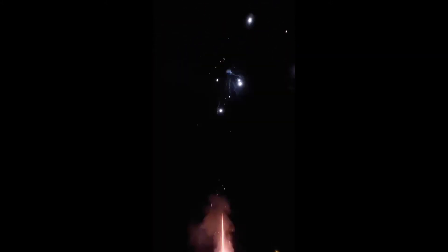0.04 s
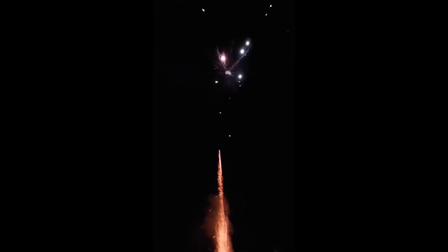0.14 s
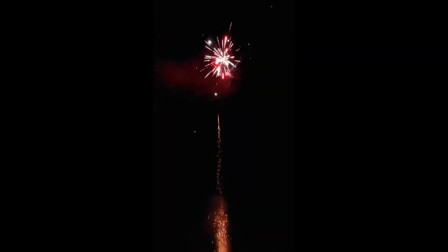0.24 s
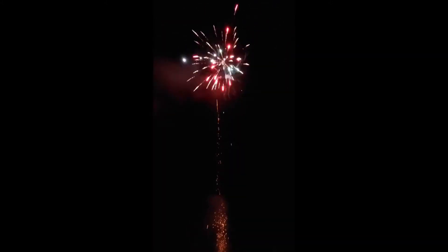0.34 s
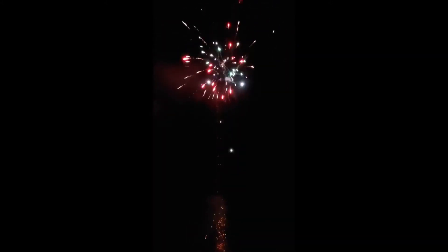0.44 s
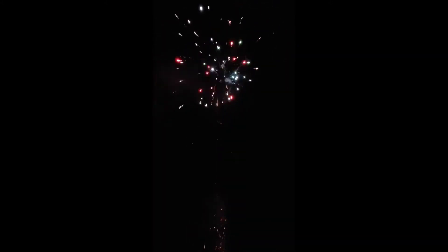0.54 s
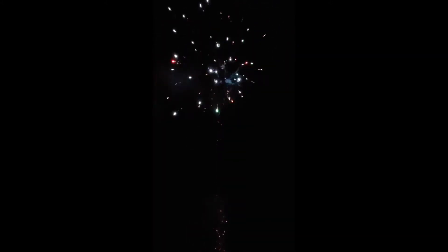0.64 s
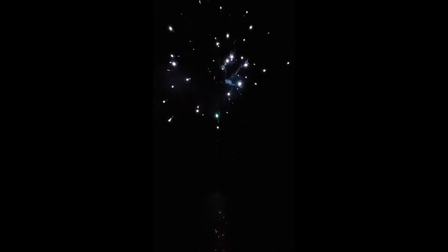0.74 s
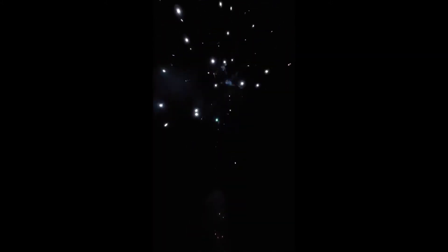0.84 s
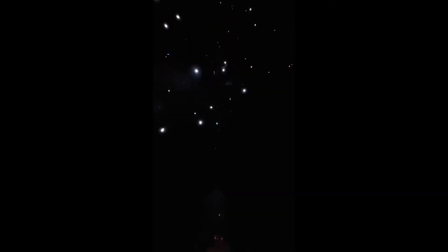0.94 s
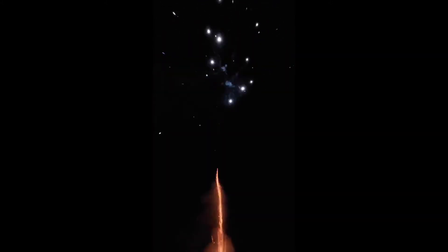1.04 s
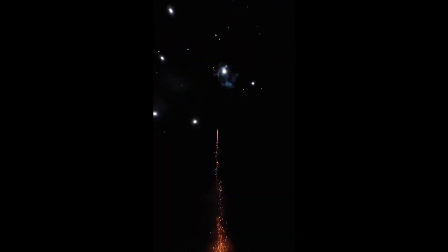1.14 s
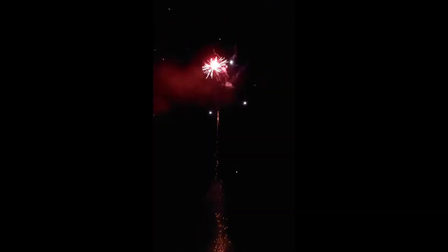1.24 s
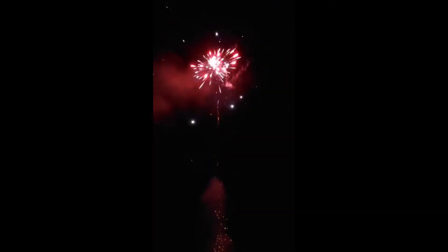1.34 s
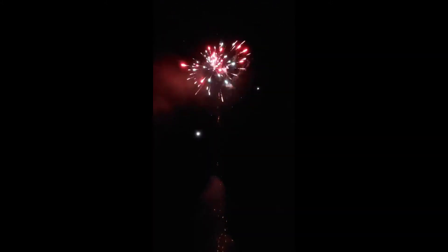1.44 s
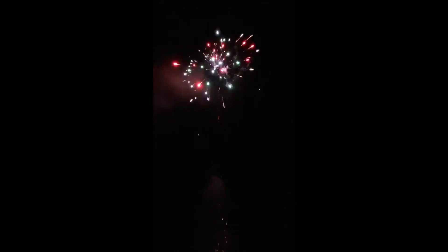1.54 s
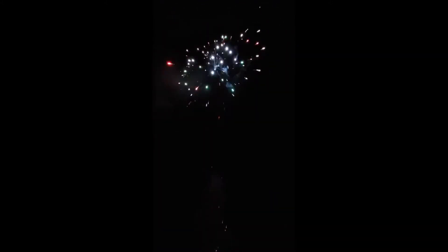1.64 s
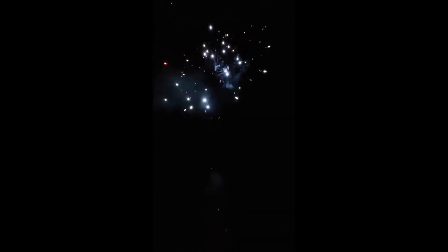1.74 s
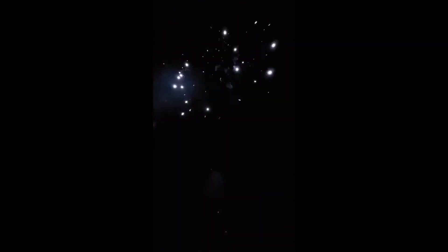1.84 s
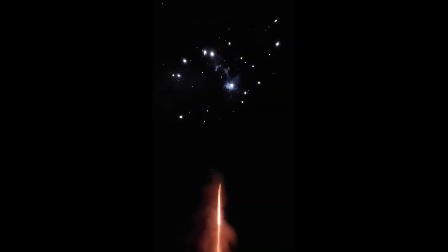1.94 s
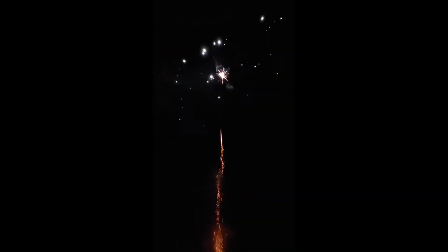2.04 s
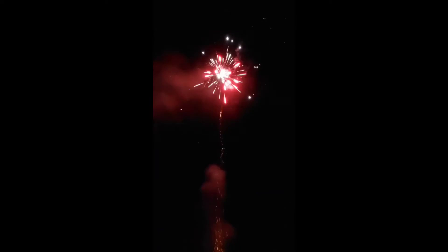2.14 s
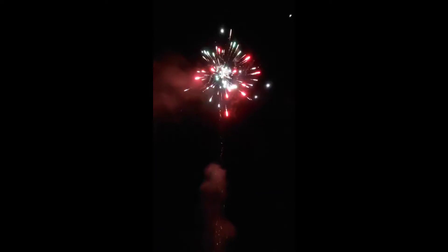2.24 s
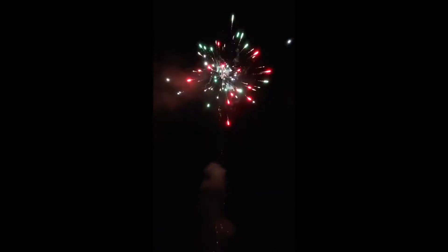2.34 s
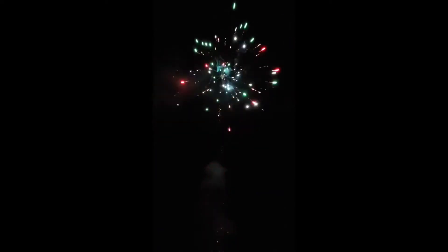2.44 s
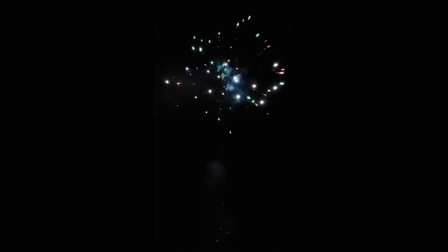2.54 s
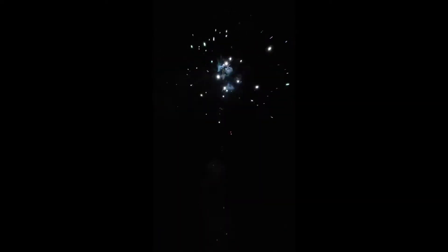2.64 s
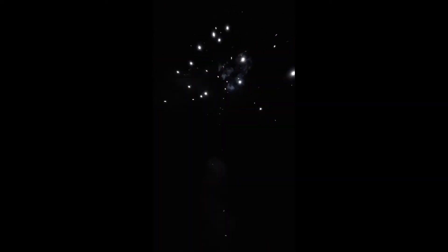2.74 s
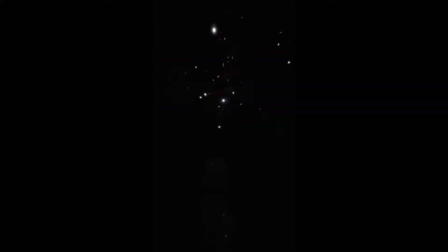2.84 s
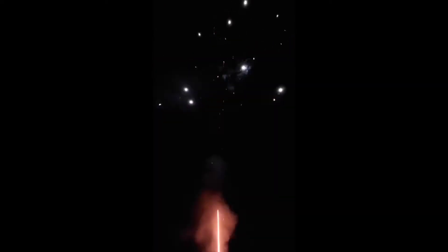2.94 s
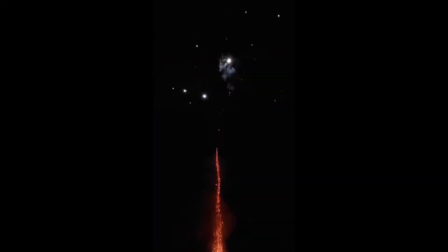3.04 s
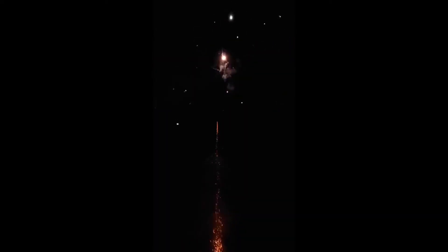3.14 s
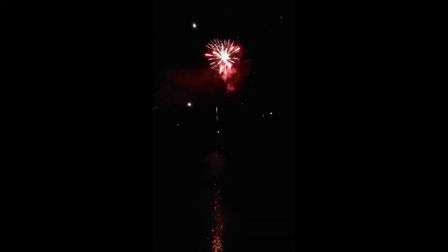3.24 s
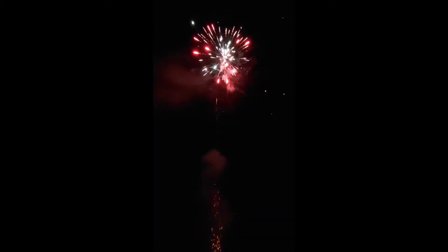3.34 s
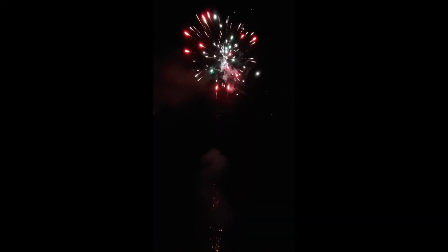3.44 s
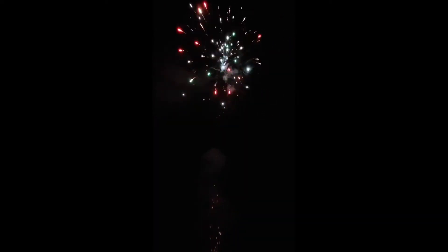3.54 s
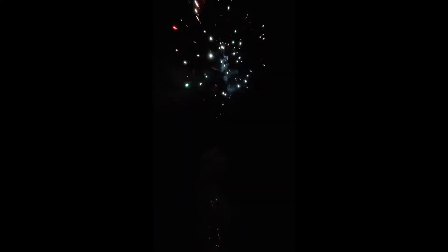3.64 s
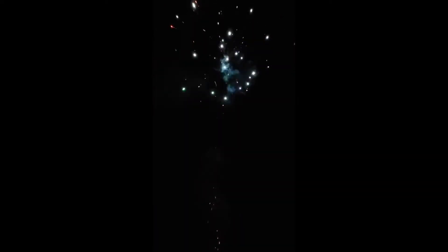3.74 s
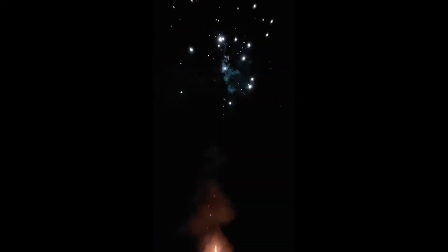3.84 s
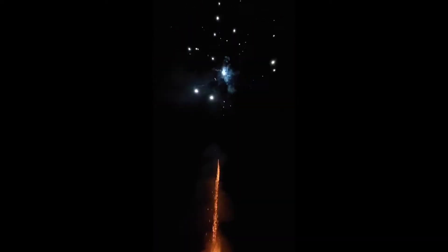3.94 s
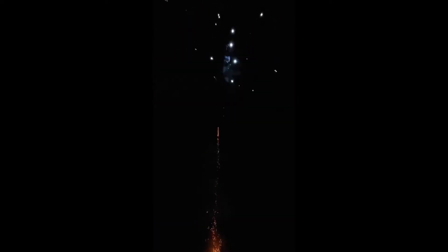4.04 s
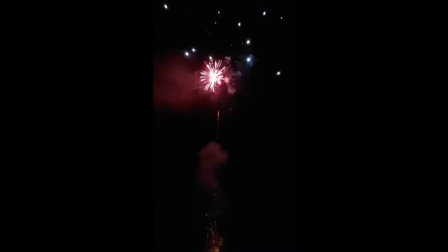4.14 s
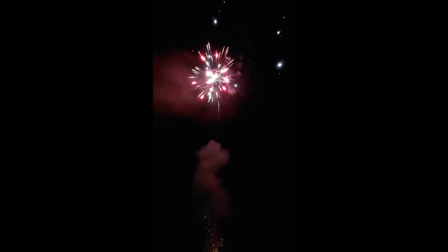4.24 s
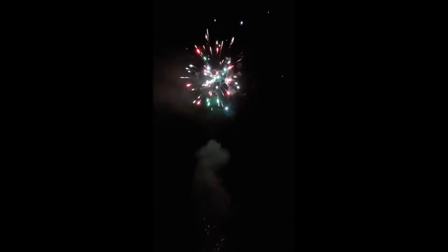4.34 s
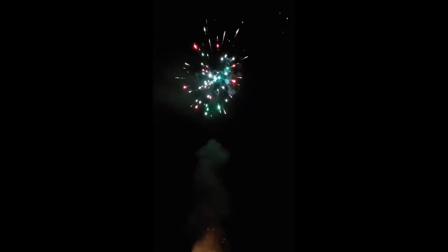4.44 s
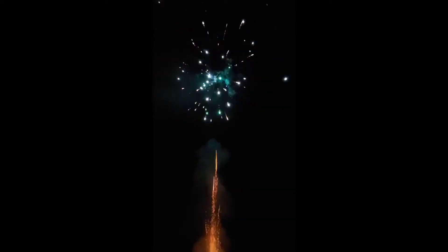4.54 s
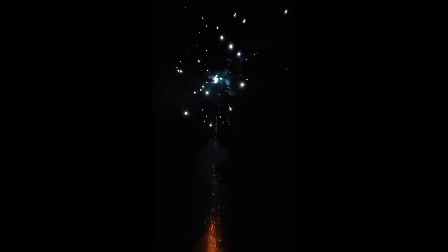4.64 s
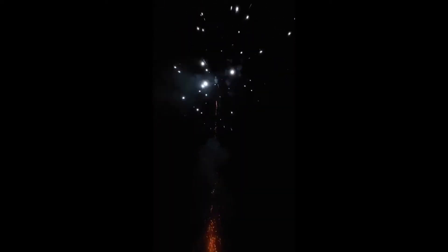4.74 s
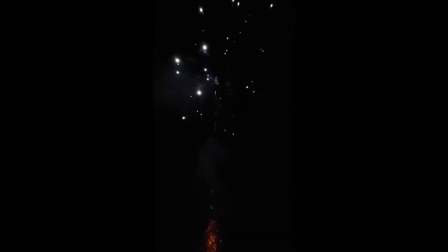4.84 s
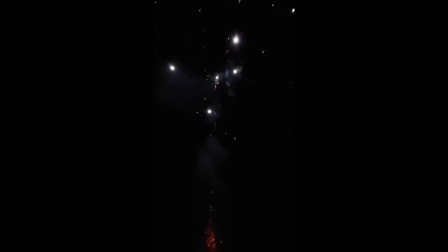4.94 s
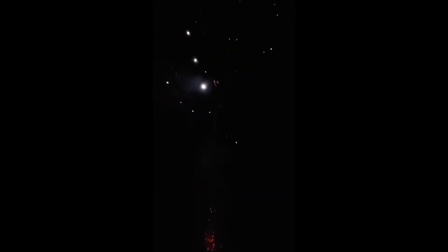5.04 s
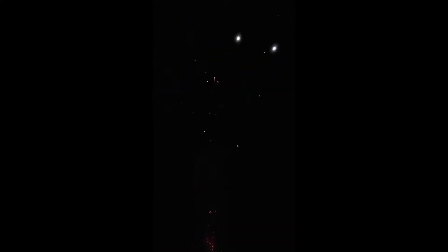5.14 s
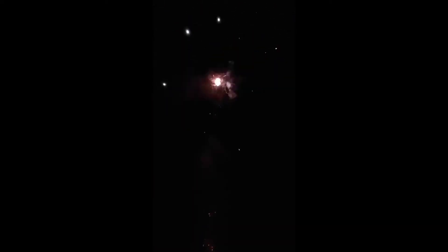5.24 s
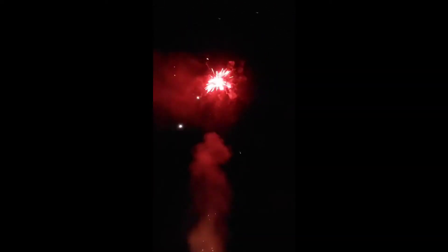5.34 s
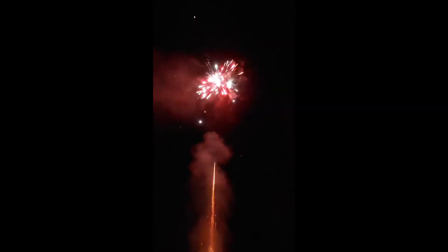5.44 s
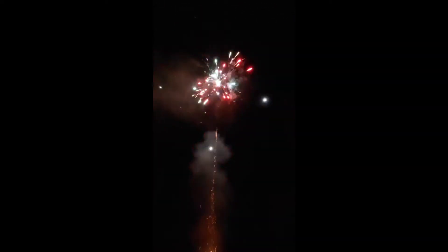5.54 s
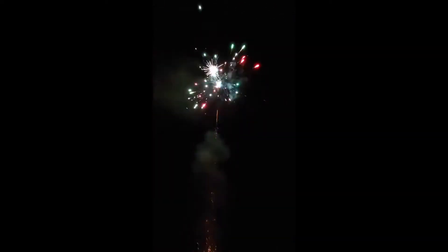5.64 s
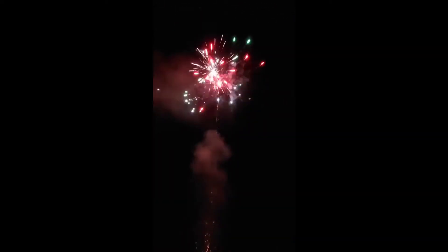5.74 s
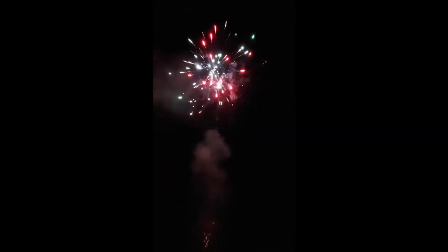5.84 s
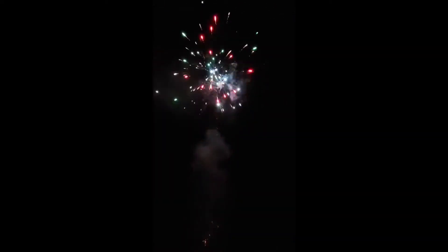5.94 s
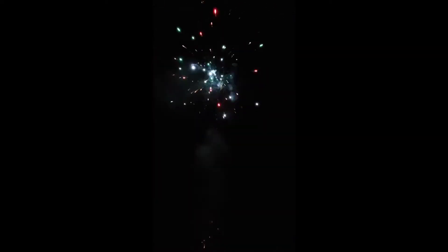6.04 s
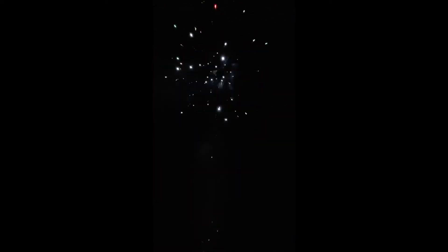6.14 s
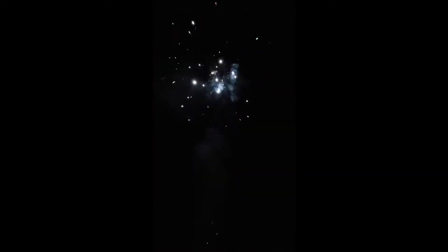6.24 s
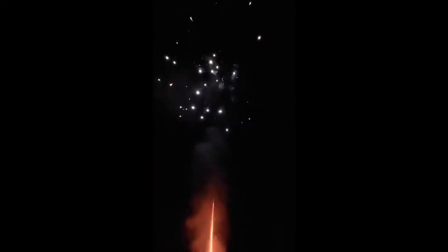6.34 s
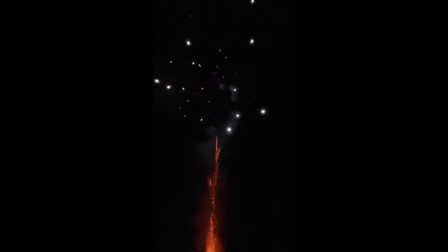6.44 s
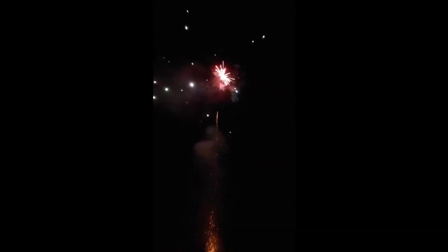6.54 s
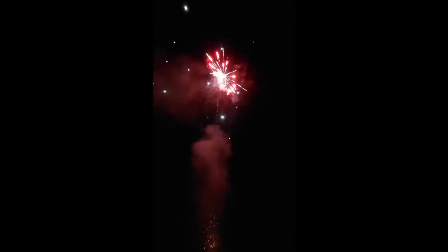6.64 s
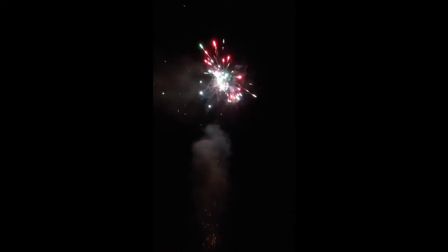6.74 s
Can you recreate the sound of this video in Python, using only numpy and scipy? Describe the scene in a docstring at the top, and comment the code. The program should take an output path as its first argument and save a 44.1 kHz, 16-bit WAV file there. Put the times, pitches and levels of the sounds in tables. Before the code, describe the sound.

A firework cake fires shot after shot outdoors, sharp launch bangs alternating with deeper overhead bursts that echo into the distance.

```python
"""A firework cake fires shot after shot, outdoors at night.
Each lift charge leaves its tube with a sharp bang and a hollow knock; the shell bursts overhead with
a deeper report. Both are a pressure swing with a crack of noise on its front and a thump of gas below.
Walls and ground slap each blast back, the surroundings scatter it, and it rolls away into the distance.
Underneath lies a bed of quiet night air, with one far thud and one thin snap."""
import sys
import numpy as np
from scipy import signal
from scipy.fft import rfft, irfft, next_fast_len
from scipy.io import wavfile
from scipy.ndimage import uniform_filter1d

SR = 44100
rng = np.random.default_rng(int(sys.argv[2]) if len(sys.argv) > 2 else 0)


def generate_wav(sig):
    """Save sig (samples, or channels by samples) to the path in sys.argv[1] as 16-bit PCM at SR."""
    pcm = np.round(np.clip(np.atleast_2d(sig).T, -1, 1) * 32767).astype(np.int16)
    wavfile.write(sys.argv[1], SR, pcm)


N = 298998


def amp(db):
    """Decibels to gain."""
    return 10 ** (np.asarray(db) / 20)


def pan(db):
    """Channel gains for a left-minus-right level difference."""
    return amp([[db / 2], [-db / 2]])


def curve(points, hz):
    """A table joined by straight lines on a log-frequency axis."""
    f, value = np.transpose(points)
    return np.interp(np.log(hz + 1), np.log(f + 1), value)


def add(mix, s, sound):
    """Mixes a stereo sound in at time s."""
    start = round(s * SR)
    sound = sound[:, max(-start, 0):]
    part = mix[:, max(start, 0):][:, :sound.shape[1]]
    part += sound[:, :part.shape[1]]


# Stereo image of diffuse sound, mono in the bass and wide on top: f/Hz, coherence
COHERENCE = [(60, 1), (130, 0.78), (290, 0.85), (640, 0.22), (1400, -0.25), (3000, 0.03), (16000, 0.032)]

def noise(spectrum, size, treble_db=0, ring=()):
    """Diffuse stereo noise with resonant peaks, set to unit level ahead of a treble shelf."""
    hz = np.fft.rfftfreq(size, 1 / SR)
    left, unrelated = rfft(rng.standard_normal((2, size)))
    alike = np.clip(curve(COHERENCE, hz), -1, 1)
    right = alike * left + np.sqrt(1 - alike ** 2) * unrelated
    peaks_db = sum(db / (1 + (2 * (hz - centre) / width) ** 2) for centre, width, db in ring)
    colour = amp(curve(spectrum, hz) + peaks_db)
    colour /= np.sqrt(np.mean(colour ** 2))
    shelf = amp(treble_db * hz ** 2 / (hz ** 2 + 1400 ** 2))
    return irfft(np.array([left, right]) * colour * shelf, size)


def die_away(x, decay, hold_s, rise_s, patchy_db=1.66):
    """Reverb envelope: echoes build up and hold, then each band fades unevenly at its own speed."""
    hz, t, bands = signal.stft(x, SR, nperseg=256)
    patches = uniform_filter1d(rng.standard_normal(bands.shape[1:]), size=9, axis=1)
    patches = uniform_filter1d(patches, size=2, axis=0)
    fall_db = 60 * np.maximum(t - hold_s, 0) / curve(decay, hz)[:, None]
    faded = signal.istft(bands * amp(patchy_db * patches / patches.std() - fall_db), SR, nperseg=256)[1]
    attack = 1 - np.exp(-(np.arange(x.shape[1]) / SR / rise_s) ** 2)
    return faded[:, :x.shape[1]] * attack


def clumps(size, per_s, depth_db):
    """A random gain: echoes arrive in clumps."""
    knots = np.arange(size) / SR * per_s
    return amp(depth_db * np.interp(knots, np.arange(1024), rng.standard_normal(1024)))


# Dark tone of the ambience bed: f/Hz, level/dB
NIGHT_TONE = [(20, -14), (60, -7.5), (130, 0), (400, -3), (700, -6.5), (1100, -10.5), (2400, -23),
              (3500, -36), (9300, -38.5), (12500, -33), (16000, -41.5)]

def night_air():
    """A faint, steady bed of low noise."""
    return amp(-58.5) * noise(NIGHT_TONE, N)


def thump(db, hz, fade_s, pan_db=0, skew_rad=0, size=8192):
    """The push of expanding gas: a fast-dying bass swing, with a random phase skew between channels."""
    t = np.arange(size) / SR
    phase = skew_rad * rng.uniform(-1.2, 1) * np.array([[1], [-1]])
    envelope = t / fade_s * np.exp(1 - t / fade_s)
    return amp(db) * np.sin(2 * np.pi * hz * t + phase) * envelope * pan(pan_db)


def small_pops(size=4096):
    """A soft, far thud and one thin snap between the shots."""
    out, t = np.zeros((2, N)), np.arange(size) / SR
    add(out, 4.208, thump(-41.5, hz=100, fade_s=.014))
    snap = np.diff(rng.standard_normal((2, size + 1))) * np.exp(-t / .00064)  # all treble
    add(out, 4.7035, amp(-28) * snap)
    return out


# Tone of the distant echoes: f/Hz, level/dB
ROLL_TONE = [(25, -23.5), (90, -9), (190, -8.5), (430, 1.5), (680, -4.5), (1100, -10), (2500, -14),
             (5000, -23), (9300, -37.5), (12500, -40), (16000, -44)]
# Length of their tail: f/Hz, T60/s
ROLL_T60 = [(60, 2), (450, 2.22), (1500, 2.26), (5000, 1.83), (14000, 2.46)]

def roll(db, hold_s, rise_s, treble_db=0, size=81920):
    """Distant houses and trees return a long rumble that comes in swells, under a smooth hiss."""
    tail = amp(db) * die_away(noise(ROLL_TONE, size, treble_db), ROLL_T60, hold_s, rise_s)
    rumble = signal.sosfiltfilt(signal.butter(2, 900, fs=SR, output="sos"), tail)
    hiss = tail - rumble
    return hiss + rumble * clumps(size, per_s=36, depth_db=3.5)


def far_echo(db, fade_s=.009, size=8192):
    """A report comes back from a distant wall, dull and smeared."""
    t = np.arange(size) / SR
    return amp(db) * noise(ROLL_TONE, size, treble_db=-10.5) * t / fade_s * np.exp(1 - t / fade_s)


def near_surface(x, spacing_hz=985, depth_db=1.34):
    """Sound from above glances off a surface near the microphone: a light comb filter in the mids."""
    hz = np.fft.rfftfreq(x.shape[1], 1 / SR)
    mids = hz ** 2 / (hz ** 2 + 1000 ** 2) / (1 + (hz / 7000) ** 4)
    comb_db = -depth_db * np.cos(2 * np.pi * hz / spacing_hz) * mids
    return irfft(rfft(x) * amp(comb_db), x.shape[1])


# Tone of the crack on a blast's front: f/Hz, level/dB
CRACK_TONE = [(100, -16), (500, 3.5), (1200, 2), (2300, -1), (4000, -9.5), (7000, -13.5), (9800, -22),
              (12500, -17), (16000, -18.5)]

def blast(swing_db, hz, crack_db, fade_s, pan_db=0, ring=(), size=6144):
    """One pressure swing for body, its pitch and size varying by chance, and a ragged crack for attack."""
    pitch, left, right = np.exp(.058 * rng.standard_normal(3))
    t = np.arange(size) / SR - np.array([[.0003], [0]])  # reaches the right channel first
    phase = np.pi * (hz * pitch * t - .5)
    swing = (1 - 2 * phase ** 2) * np.exp(-phase ** 2) * [[left], [right]] * pan(pan_db)
    crack = noise(CRACK_TONE, size, ring=ring) * np.exp(-np.maximum(t, 0) / fade_s)
    return (amp(swing_db) * swing + amp(crack_db) * crack) * (t > 0)


# Slapback of a launch off the walls, nearest first: t/s, level/dB
WALL_SLAPS = [(0.0104, -5.5), (0.0116, -9), (.04, -18.5), (.066, -15), (.1025, -22.5)]

def lift_bang(swing_db, ground_lag_s=.0022, size=12288):
    """A lift charge: a bright direct blast, a duller ground bounce, then a thin slap from each wall."""
    out = np.zeros((2, size))
    bite, snap = [(1440, 1200, 1.3)], [(12500, 9000, 4.9)]  # f/Hz, width/Hz, boost/dB
    add(out, 0, blast(swing_db - 9, hz=346, crack_db=-4.5, fade_s=.0017, ring=bite + snap))
    bounce = blast(swing_db - 19, hz=180, crack_db=-13.5, fade_s=.005, pan_db=-4.5, ring=bite)
    add(out, ground_lag_s, bounce)
    for delay, db in WALL_SLAPS:
        add(out, delay, -amp(db) * blast(-13.5, hz=685, crack_db=-5, fade_s=.0028, ring=bite))
    return out


# Resonances of the launch tubes and their casing: f/Hz, width/Hz, level/dB
TUBE_MODES = [(784, 180, 4.5), (1140, 41, 4.5), (1565, 70, 1.5), (1700, 96, 5.5), (1823, 75, 5.5),
              (2715, 54, 2.5), (3080, 46, -1.5)]

def tube_knock(db, fade_s=.0079, size=4096):
    """The tubes give a short hollow knock, heard once directly and once off the nearest wall."""
    t = np.arange(size) / SR
    hz, _, mode_db = np.transpose(TUBE_MODES)[:, :, None]
    knock = np.zeros((2, size))
    for delay in (0, WALL_SLAPS[0][0]):
        phase = rng.uniform(0, 2 * np.pi, (2, len(hz), 1))
        modes = amp(mode_db) * np.sin(2 * np.pi * hz * t + phase)
        add(knock, delay, modes.sum(1) * np.exp(-t / fade_s))
    return amp(db) * knock


# Launch cues, as trims on a typical shot: t/s, level/dB, swing/dB, thump/dB, fresh-echo treble/dB
LAUNCH_CUES = [(0.1969, 1, 0, 4, 2.5), (1.096, -.5, -8, 5.5, 4), (2.0319, 0, 3, 3.5, 4),
               (3.0508, 0.5, -5, 7, 5.9), (3.9783, 0, 1.5, 10.5, -2), (4.592, 0.1, -2.5, 8, 2.7),
               (5.4958, -2.5, -6, -5, -5), (6.464, 2.5, 0, 2.5, 3.4)]
# Tone of a launch's scattered echoes: f/Hz, level/dB
LAUNCH_ECHO_TONE = [(20, -16.5), (55, -11.5), (120, -1), (270, 5.5), (500, 0.5), (900, -2.5), (1900, -3.5),
                    (3200, -7.5), (7000, -18), (9700, -24), (12500, -20), (16000, -27)]
# Length of their tail: f/Hz, T60/s
LAUNCH_T60 = [(50, 0.67), (250, 0.29), (1000, 0.47), (3000, 0.5), (7000, 0.46), (14000, 0.38)]

def launches(shared=.55, size=32768):
    """Lift charges bang, knock and thump from one spot, so they share much of their echo pattern."""
    out = np.zeros((2, N))
    pattern = noise(LAUNCH_ECHO_TONE, size, ring=TUBE_MODES)
    for s, db, swing_db, thump_db, treble_db in LAUNCH_CUES:
        fresh = noise(LAUNCH_ECHO_TONE, size, treble_db, TUBE_MODES)
        echoes = np.sqrt(shared) * pattern + np.sqrt(1 - shared) * fresh
        echoes = die_away(echoes, LAUNCH_T60, hold_s=.029, rise_s=.009)
        echoes *= clumps(size, per_s=860, depth_db=.5)
        add(out, s, amp(db) * lift_bang(swing_db))
        add(out, s, tube_knock(db - 28.5))
        add(out, s + .00072, thump(thump_db - 23, hz=94, fade_s=.0039, pan_db=4, skew_rad=.7))
        add(out, s, amp(db - 21.5) * echoes * pan(.4))
        add(out, s, roll(-53, hold_s=.19, rise_s=.06, treble_db=2))
    return out


def report(ground_lag_s=.007, wall_lag_s=.0095, size=8192):
    """A shell's deep blast, its sharper, inverted ground reflection, and a dull boom off a near wall."""
    out = np.zeros((2, size))
    add(out, 0, blast(-6, hz=212, crack_db=-8.5, fade_s=.003, pan_db=-4.5))
    add(out, ground_lag_s, -blast(-.6, hz=460, crack_db=-26.5, fade_s=.003, pan_db=-4.5))
    add(out, wall_lag_s, -blast(-17.5, hz=145, crack_db=-20, fade_s=.003))
    return out


# Burst cues, as trims on a typical shell: t/s, report level/dB, thump level/dB
BURST_CUES = [(0.3793, 1.5, 4), (1.411, -0.5, -15), (2.2456, -1.5, 19), (3.397, 0, 15), (4.299, 2, 14),
              (5.4762, 1, -15), (5.8539, 0.5, -15), (6.726, -1.3, 19)]
# Tone of a burst's scattered echoes: f/Hz, level/dB
BURST_ECHO_TONE = [(20, -14), (55, -21.5), (110, -9), (270, 2.5), (520, 0), (1000, -5.5), (2300, -12.5),
                   (3500, -18.5), (7000, -23.5), (9700, -31.5), (12500, -26), (16000, -34.5)]
# Length of their tail: f/Hz, T60/s
BURST_T60 = [(50, 0.19), (250, 0.44), (1000, 0.58), (3000, 0.71), (7000, 0.63), (14000, 0.48)]
# Delay taps from distant walls: t/s, level/dB
FAR_TAPS = [(.13, -30.5), (.195, -33), (.295, -37.5), (.42, -49), (.505, -46)]

def bursts(size=36864):
    """Shells burst high up: a report and a low thump, then wide scatter, far echoes and a long roll."""
    direct, diffuse = np.zeros((2, 2, N))
    for s, report_db, thump_db in BURST_CUES:
        echoes = noise(BURST_ECHO_TONE, size, treble_db=3)
        echoes = die_away(echoes, BURST_T60, hold_s=.037, rise_s=.0071)
        echoes *= clumps(size, per_s=120, depth_db=-.3)
        add(direct, s, amp(report_db) * report())
        add(direct, s + .012, thump(thump_db - 38, hz=55.7, fade_s=.004, pan_db=-5.5, skew_rad=.5))
        add(diffuse, s, amp(-21.5) * echoes * pan(.68))
        add(diffuse, s, roll(-37, hold_s=.2, rise_s=.13))
        jitter = rng.standard_normal((len(FAR_TAPS), 2))  # each shell bursts at another spot
        for (delay, db), (shift, trim_db) in zip(FAR_TAPS, jitter):
            add(diffuse, s + delay + .012 * shift, far_echo(db + trim_db))
    add(diffuse, -.62, roll(-40, hold_s=.18, rise_s=.1))  # open on the tail of an earlier burst
    return direct + near_surface(diffuse)


def scene():
    """The cake's launches and bursts over the quiet night air."""
    return launches() + bursts() + small_pops() + night_air()


# Stereo colour of the two microphone ports: f/Hz, left-minus-right level/dB
PORT_BALANCE = [(150, 1), (260, -1.5), (550, 2), (1000, 0), (2200, 2), (4500, 0), (6500, 1.5), (8700, 6.5),
                (12000, -3), (16000, 1)]

def record(dry, low_cut_hz=35, ceiling=.95, high_cut_hz=16100):
    """Two small ports colour the sound and lose the deepest bass; a soft clip and a high cut follow."""
    size = next_fast_len(N + 4096)
    balance_db = curve(PORT_BALANCE, np.fft.rfftfreq(size, 1 / SR))
    coloured = irfft(rfft(dry, size) * amp(np.outer([.5, -.5], balance_db)), size)[:, :N]
    lean = signal.sosfilt(signal.butter(3, low_cut_hz, "highpass", fs=SR, output="sos"), coloured)
    rounded = lean / (1 + (abs(lean) / ceiling) ** 4) ** (1 / 4)
    high_cut = signal.firwin(255, high_cut_hz, window=("kaiser", 9), fs=SR)
    return signal.oaconvolve(rounded, high_cut[None], "same")


dry = scene()
out = record(dry)
generate_wav(out)
```